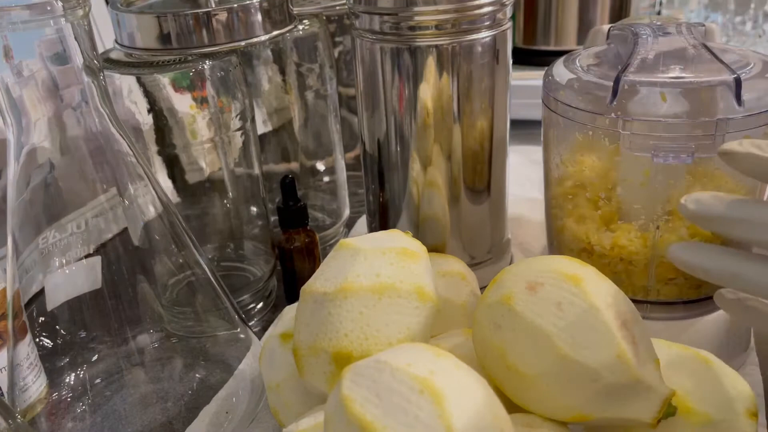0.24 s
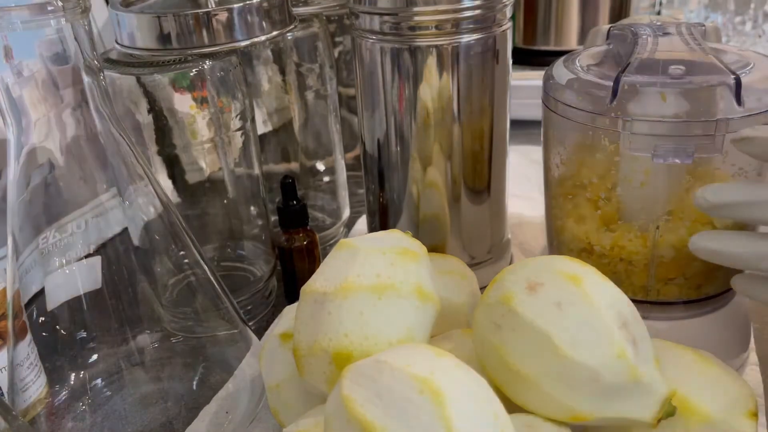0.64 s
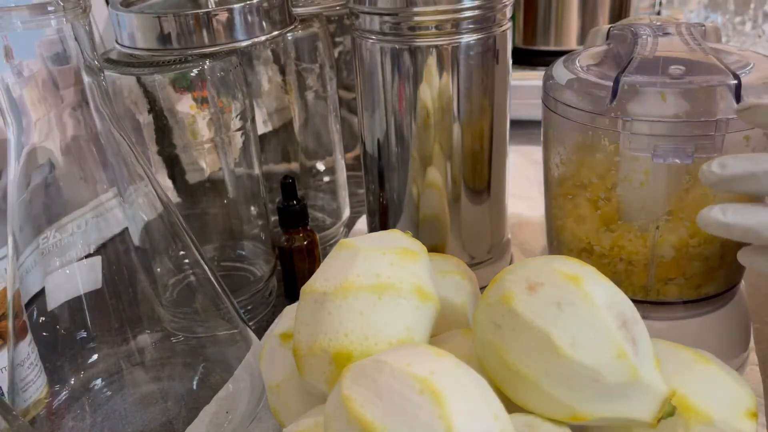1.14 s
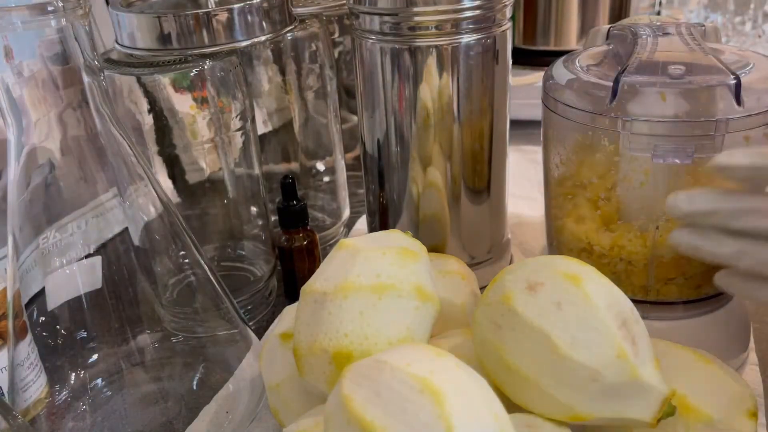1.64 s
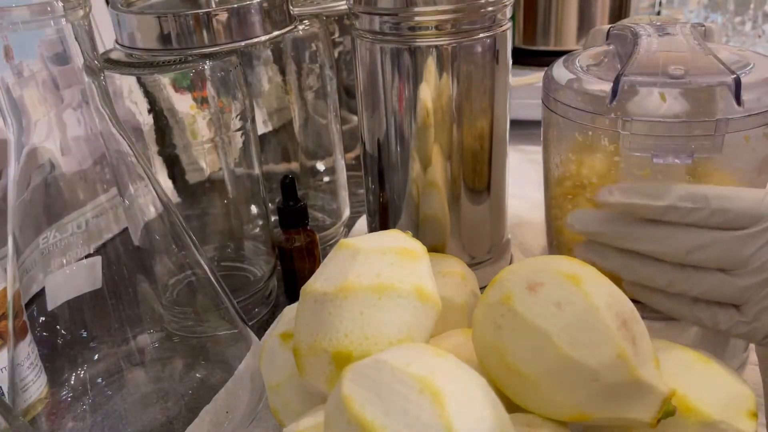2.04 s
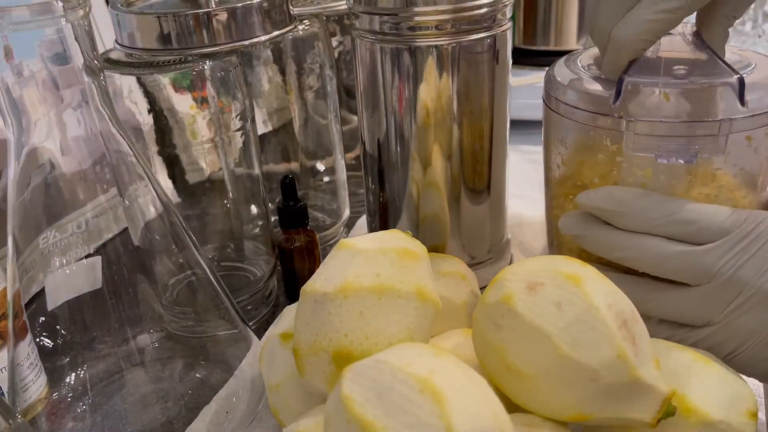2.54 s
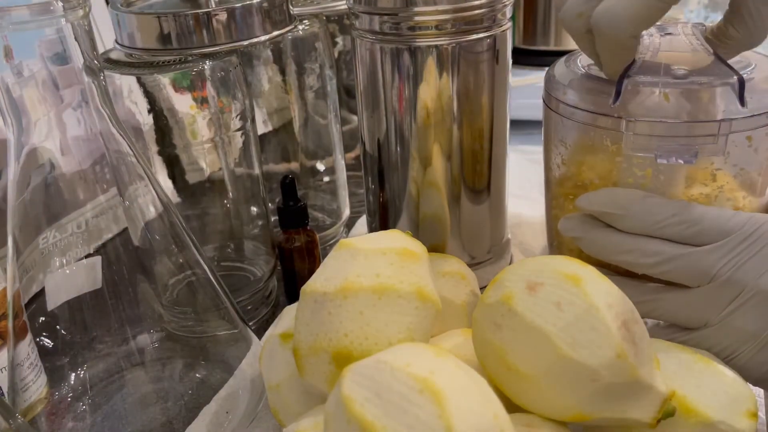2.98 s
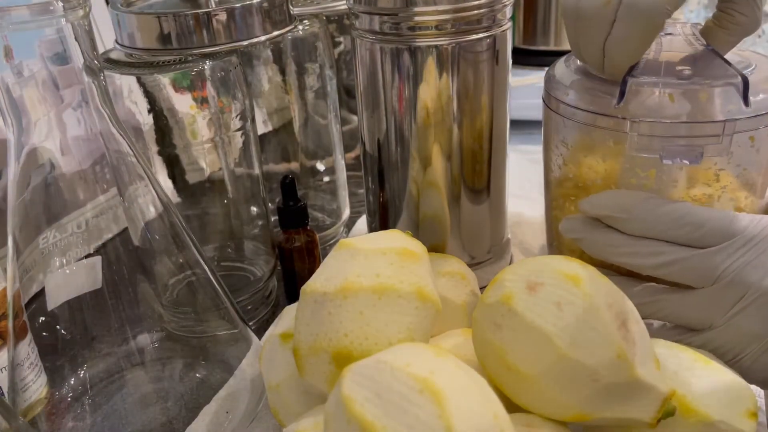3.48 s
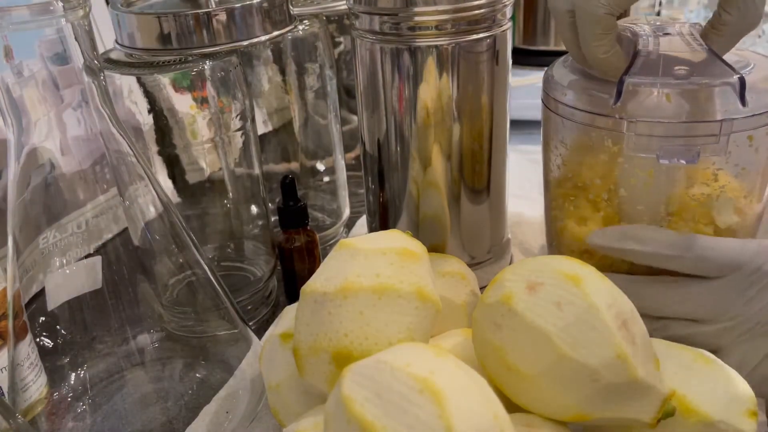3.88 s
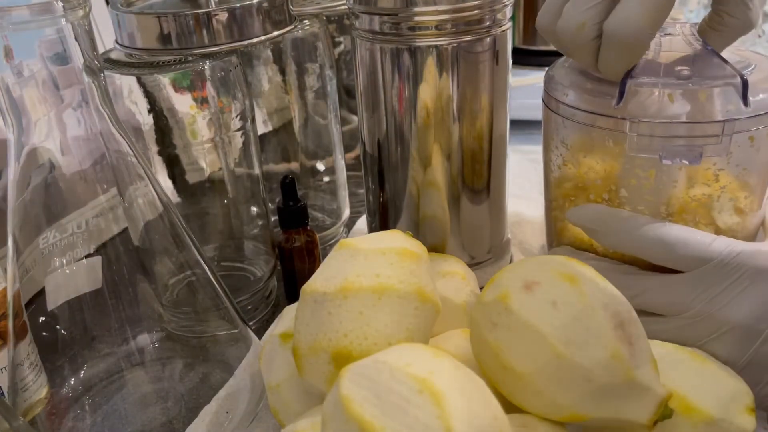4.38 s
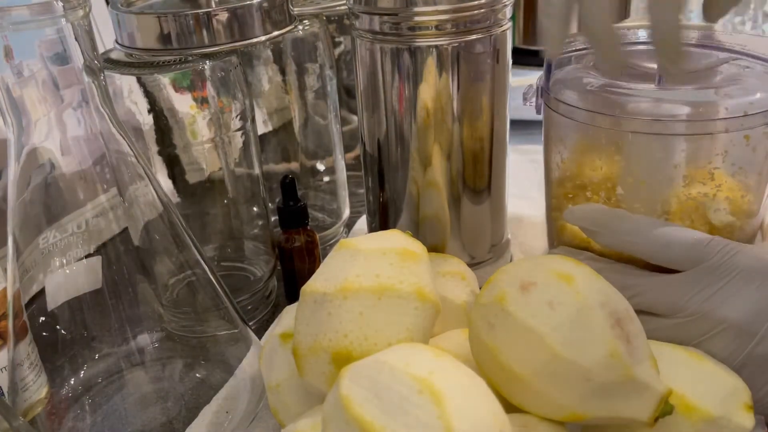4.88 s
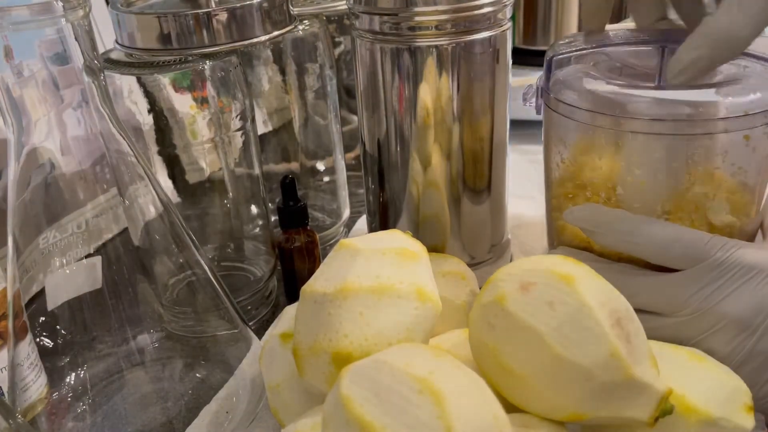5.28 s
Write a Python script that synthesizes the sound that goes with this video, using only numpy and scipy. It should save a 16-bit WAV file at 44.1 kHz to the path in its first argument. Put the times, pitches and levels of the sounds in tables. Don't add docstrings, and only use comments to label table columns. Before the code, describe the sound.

Gloved hands fumble with a small plastic chopper on a counter, with ticks and knocks, until the lid cracks loose loudly and drops back.

```python
import sys
import numpy as np
from scipy import signal
from scipy.io import wavfile
from scipy.ndimage import map_coordinates

SR = 44100
rng = np.random.default_rng(int(sys.argv[2]) if len(sys.argv) > 2 else 0)


def transcribe(u):
    v = np.clip(np.atleast_2d(u).T, -1, 1)
    q = np.round(v * 32767).astype(np.int16)
    wavfile.write(sys.argv[1], SR, q)


def volts(x):
    e = np.asarray(x, float) / 20
    return 10 ** e


N = 243431
TIME = np.arange(N) / SR


def rms_one(x):
    return x / np.sqrt(np.mean(x ** 2) + 1e-20)


def band(x, low_hz, high_hz):
    limits = [low_hz, min(high_hz, .45 * SR)]
    return signal.sosfilt(signal.butter(2, limits, "band", fs=SR, output="sos"), x)


def bank(level_of, per_octave=2):
    white = rng.standard_normal((2, N))
    edges = 45 * 2 ** np.arange(0, 8.6, 1 / per_octave)
    total = 0
    for k, (low, high) in enumerate(zip(edges, edges[1:])):
        total = total + band(white[k % 2], low, high) * level_of(np.sqrt(low * high))
    return total


def at_hz(points, hz):
    points = np.array(points)
    return np.interp(np.log(hz), np.log(points[:, 0]), points[:, 1])


def drift(rate):
    knots = rng.standard_normal(600)
    return map_coordinates(knots, [TIME * rate + 2], order=3)


def friction(per_s, spread_db):
    sizes = volts(spread_db * np.minimum(rng.exponential(1, N), 4)) * rng.standard_normal(N)
    return sizes * (rng.random(N) < per_s / SR)


def ring(push, hz, t60):
    radius = volts(-60 / (t60 * SR))
    angle = 2 * np.pi * hz / SR
    return signal.lfilter([0, np.sin(angle)], [1, -2 * radius * np.cos(angle), radius ** 2], push + 1e-18)


def rattle(t60, rise_s):
    t = TIME[:SR // 2]
    return rng.standard_normal(len(t)) * volts(-60 * t / max(t60, .001)) * np.clip(t / rise_s, 0, 1)


def add(out, s, sound, peak_db):
    at = round(s * SR)
    out[at:at + len(sound)] += (volts(peak_db) * sound / np.abs(sound).max())[:N - at]


def add_edges(out, s, push, peak_db, clack_db, crack_db, top_hz=8700):
    add(out, s, band(band(push, 900, 3120), 740, 6600), peak_db + clack_db)
    add(out, s, band(push, 4600, top_hz), peak_db + crack_db)


def contacts(table, rise_s, hollow_db, crack_db, follows):
    out = np.zeros(N)
    for s, peak_db, hz, hard_db, t60 in table:
        push = rattle(t60, rise_s)
        add(out, s, band(push, hz / 1.89, hz * 1.525), peak_db - 4.0)
        add(out, s, ring(push, hz, 16 / hz), peak_db + hollow_db)
        treble = push * volts(-60 * TIME[:SR // 2] / max(t60, .001))
        add_edges(out, s, treble, peak_db, hard_db + 4.0, crack_db + follows * hard_db)
    return out


def strokes(moves, rest_db, rise_s, fall_s):
    power = volts(rest_db) ** 2
    for s, length, db in moves:
        rising = (TIME - s) / rise_s + .5
        falling = (s + length - TIME) / fall_s + .5
        shape = np.clip(np.minimum(rising, falling), 0, 1)
        power = power + (volts(db) * np.sin(np.pi / 2 * shape) ** 2) ** 2
    return np.sqrt(power)


def leaning():
    # start_s, length_s, rumble_db
    leans = [
        (0.0, 0.077, -15),
        (1.06, 0.24, -28.5),
        (1.6, 0.24, -28.5),
        (2.34, 0.056, -33),
        (2.65, 0.11, -31),
        (2.98, 0.19, -32.5),
        (3.3, 0.33, -46),
        (4.46, 0.29, -26),
        (4.84, 0.2, -28),
        (5.18, 0.084, -30.5),
    ]
    shaking = rng.standard_normal(N)
    rumble = volts(-6) * rms_one(band(band(band(shaking, 10, 21), 10, 24), 10, 30))
    hum = volts(-54) * rms_one(band(shaking, 27, 42)) * volts(1.2 * drift(3.2))
    return hum + rumble * strokes(leans, rest_db=-38, rise_s=0.077, fall_s=0.077)


def room_hiss():
    # pitch_hz, level_db
    colour = [(50, 7.5), (120, -3.5), (300, -8.5), (800, -18.5), (2000, -25), (5000, -31.5), (10000, -39),
              (15500, -33.5)]
    return volts(-58.5) * rms_one(bank(lambda hz: volts(at_hz(colour, hz))))


def sleeve_and_gloves():
    # start_s, length_s, level_db
    sleeve_moves = [(.6, 0.2, -60), (1.11, 0.22, -53), (1.24, 0.16, -66), (3.44, 0.18, -64),
                    (1.4, 0.26, -54), (1.62, 0.12, -60), (1.8, 0.086, -60.5), (2.25, 0.023, -39),
                    (2.33, 0.17, -59), (2.66, 0.09, -55.5), (2.84, 0.078, -64), (2.97, 0.099, -60.5),
                    (3.25, 0.83, -64), (3.99, 0.065, -54), (4.1, 0.55, -60), (4.47, 0.25, -49),
                    (4.7, 0.28, -58.5), (5.1, 0.12, -53.5), (5.28, 0.065, -40), (5.4, 0.18, -45)]
    # start_s, length_s, rustle_db, drag_db (against the rustle)
    grips = [(.08, 0.49, -70.5, -8.5), (0.927, 0.14, -67.5, -8), (1.154, 0.29, -64.5, -22),
             (1.587, 0.46, -73, -2.5), (2.265, 0.11, -61.5, -12), (2.411, 0.14, -62, -17),
             (2.597, 0.079, -62.5, -4), (2.826, 0.11, -61.5, -4), (2.952, 0.045, -63, -18),
             (3.45, 0.18, -65, -5), (3.764, 0.097, -74, 9.5), (3.913, 0.175, -69, 6),
             (4.122, 0.13, -68.5, -3), (4.45, 0.26, -55.5, -2), (4.822, 0.2, -63, -6),
             (5.041, 0.15, -71, 9.5), (5.272, 0.21, -52, 3)]
    sleeve = rms_one(band(friction(4000, 2.2), 150, 1200)) * volts(3 * drift(30))
    drag = rms_one(band(band(friction(12000, 1.2), 1600, 3000), 1300, 3300)) * volts(1.5 * drift(30))
    rustle = rms_one(band(friction(20000, 1.2), 3900, 11000)) * volts(1.5 * drift(30))
    drag_moves = [(s, length, db + rel_db) for s, length, db, rel_db in grips]
    rustle_moves = [(s, length, db) for s, length, db, _ in grips]
    return (sleeve * strokes(sleeve_moves, rest_db=-71.5, rise_s=0.04, fall_s=0.098)
            + drag * strokes(drag_moves, rest_db=-94, rise_s=0.085, fall_s=0.12)
            + rustle * strokes(rustle_moves, rest_db=-73.5, rise_s=0.085, fall_s=0.12))


def ticks():
    # start_s, peak_db, centre_hz, rattle_t60_s
    clicks = [(0.065, -32.5, 4600, 0.0054), (.0650, -46, 2710, .006), (0.255, -49.5, 2700, 0.0087),
              (.268, -51, 10000, .012), (0.4052, -28, 5400, 0.0022), (0.4054, -37.5, 2720, 0.011),
              (0.657, -47, 4100, 0.0071), (1.481, -22.5, 5200, 0.093), (2.085, -45.5, 3930, 0.011),
              (2.5857, -43, 9050, 0.0048), (2.702, -32.5, 6300, 0.0068), (3.365, -50, 4500, 0.037),
              (3.5307, -36.5, 3900, 0.0025), (3.53, -40.5, 9100, 0.025), (3.576, -31.5, 9400, 0.021),
              (3.5754, -41.5, 1970, 0.042), (4.1116, -37, 4440, 0.0041), (4.18, -50, 10000, 0.017),
              (4.277, -38, 4140, 0.0046), (4.6136, -29.5, 5240, 0.027)]
    out = np.zeros(N)
    for s, peak_db, hz, t60 in clicks:
        add(out, s, band(rattle(t60, .0001), hz / 1.6, min(hz * 1.7, 12500)), peak_db)
    return out


def counter():
    # start_s, peak_db, pitch_hz, t60_s
    swings = [(0.066, -45, 190, 0.041), (0.404, -39.5, 199, 0.033), (1.122, -28.5, 179, 0.09),
              (1.162, -29.5, 204, 0.052), (1.195, -31, 263, 0.039), (1.14, -23, 20.65, 1),
              (2.245, -24.5, 127, 0.12), (2.256, -31, 45.8, 0.81), (3.372, -42, 141, 0.11),
              (3.578, -43, 288, .04), (.78, -46.5, 165, .07), (.88, -48.5, 155, 0.075),
              (1.239, -48, 176, .15), (1.289, -47, 216, 0.12), (4.329, -52, 350, .15),
              (4.372, -46, 345, .2), (4.089, -38, 170, 0.019), (4.221, -40.5, 245.6, 0.021),
              (4.467, -16.5, 169.2, 0.18), (4.47, -28.5, 36, .7), (4.462, -30.5, 85, .3),
              (4.76, -49, 299.4, .1), (5.2, -40, 60.26, .3), (4.6, -12.5, 170, 0.024),
              (4.6, -28, 111, 0.11), (4.74, -34, 109.7, 0.14), (4.849, -42.5, 137, 0.076),
              (5.079, -34.5, 107.6, 0.11), (5.289, -38, 135, 0.26), (5.407, -36, 160, 0.089)]
    out = np.zeros(N)
    for s, db, hz, t60 in swings:
        push = np.sin(np.pi * np.clip(TIME[:SR] * hz / 0.64, 0, 1)) ** 2
        add(out, s, ring(push, hz, t60), db)
    return out


def rubs():
    # start_s, stop_s, hum_db, hiss_db
    slides = [
        (0.074, 0.183, -63, -65.5),
        (0.41, 0.516, -67, -64),
        (1.6, 1.737, -68.5, -66),
        (1.822, 1.931, -66.5, -66.5),
        (2.3, 2.36, -68, -66),
    ]
    slips = friction(15000, 1.2)
    hum = rms_one(band(slips, 2650 / 1.1, 2650 * 1.1))
    hiss = rms_one(band(slips, 4700 / 1.25, 4700 * 1.25))
    out = np.zeros(N)
    for start, stop, hum_db, hiss_db in slides:
        gate = np.clip(np.minimum((TIME - start) / .004, (stop - TIME) / .015), 0, 1)
        out += gate * (volts(hum_db) * hum + volts(hiss_db) * hiss)
    return out


def finger_taps():
    # start_s, peak_db, knock_hz, hardness_db, rattle_t60_s
    touches = [(2.442, -30.5, 550, -8.5, 0.063), (3.063, -34.5, 500, -7, 0.075),
               (3.221, -41, 520, -6, 0.078), (3.299, -46, 470, -14, 0.05), (3.617, -51, 374, -1.5, 0.037),
               (3.702, -46.5, 570, 5, 0.07), (3.998, -45.5, 660, 4.5, 0.12), (5.418, -21, 1700, -16, 0.15),
               (4.09, -40, 543, -5, 0.058), (2.446, -38, 1330, -26, 0.099), (0.6, -55, 1790, -27, .07),
               (1.158, -42, 2000, -29, .15), (1.18, -38.5, 600, -30, 0.3), (1.393, -37, 315, -30, 0.056),
               (3.356, -38.5, 413, -30, .12), (1.352, -39, 430, -32, 0.052)]
    return contacts(touches, rise_s=0.0011, hollow_db=-6.5, crack_db=-5.5, follows=1.62)


def soft_bumps():
    # start_s, peak_db, knock_hz, hardness_db, rattle_t60_s
    bumps = [(.607, -40, 700, -43, 0.065), (.648, -55, 580, -27, .06), (.695, -47, 656, -32, 0.056),
             (.74, -56, 566, -5, 0.041), (.777, -49.5, 650, -27, 0.06), (.818, -52, 574, -28, 0.053),
             (1.077, -42.5, 716, -31, 0.14), (1.125, -42, 370, -11, 0.058), (1.171, -38, 1880, -37, 0.14),
             (1.177, -54.5, 1750, 12.5, 0.24), (2.488, -53.5, 1310, 0.5, 0.093),
             (2.616, -43, 440, -18, 0.05), (2.64, -57, 910, -23, 0.029), (2.689, -41, 510, -20, 0.063),
             (2.993, -44, 615, -12.5, 0.046), (3.029, -47, 464, -26, 0.024), (3.351, -38, 1010, -26, 0.14),
             (3.372, -38, 1280, -16, 0.023), (3.391, -45, 1240, -33, 0.041), (4.285, -47, 824, -28, 0.034),
             (4.733, -40.5, 832, -2, 0.091), (4.738, -36.5, 1230, -8.5, 0.065)]
    return contacts(bumps, rise_s=0.015, hollow_db=-3.0, crack_db=1.5, follows=1.0)


def panel_notes():
    # start_s, peak_db, pitch_hz, t60_s
    finger_notes = [(.607, -50, 650, .05), (.608, -48.5, 1800, .03), (.652, -51, 560, .08),
                    (.696, -49, 620, .08), (.698, -55, 1850, .04), (.738, -54, 540, .06),
                    (.779, -54, 610, .08), (.779, -59, 1800, .04), (.818, -53, 560, .06),
                    (1.079, -51.5, 1760, 0.036), (1.476, -15.5, 910, 0.017), (1.495, -24, 1055, .08),
                    (1.124, -43, 616, .05), (1.21, -49, 613, .06), (1.225, -52, 1650, .06),
                    (1.41, -41, 1250, .12), (2.443, -36, 1250, 0.033), (2.452, -45, 1490, 0.036),
                    (2.444, -43, 644, 0.044), (2.474, -53, 1290, .08), (2.627, -41.5, 864, .03),
                    (2.626, -37, 443, .06), (3.064, -43, 1043, .06), (3.064, -46, 1440, .05),
                    (3.064, -40.5, 3340, 0.018), (3.222, -48, 1050, .06), (3.222, -52, 1450, .05),
                    (3.365, -43, 1436, .06), (3.358, -51, 890, 0.035), (3.487, -48, 480, .04),
                    (3.531, -47.5, 2230, .04), (3.533, -51, 424, 0.061), (3.578, -54, 1500, .04),
                    (3.655, -54, 450, .05), (3.703, -50, 550, .04), (3.838, -54, 640, .04),
                    (4.074, -48, 1100, .02), (4.074, -47, 300, 0.028), (4.284, -48, 800, 0.082),
                    (4.298, -53, 704, .05), (1.49, -28.5, 499, 0.14), (1.478, -28, 2040, .03),
                    (1.48, -36, 278, 0.22), (1.478, -26, 1147, 0.047), (1.392, -34, 1850, 0.034),
                    (1.394, -40, 2390, .03), (3.369, -48, 4500, .012), (3.392, -53, 4500, .012),
                    (3.576, -41, 5700, .008), (3.224, -48.5, 450, 0.12), (4.408, -56, 2600, .04),
                    (4.443, -45, 4500, 0.01)]
    # start_s, peak_db, pitch_hz, t60_s
    lid_notes = [(4.452, -19, 250, 0.033), (4.459, -9, 320, 0.14), (4.4603, -8, 1570, .06),
                 (4.46, -10.5, 1867, .07), (4.475, -15, 940, 0.076), (4.468, -16, 1130, .05),
                 (4.478, -20, 2146, .07), (4.46, -11, 2650, .06), (4.46, -13, 2866, 0.051),
                 (4.458, -3, 5100, 0.015), (4.471, -20, 5163, 0.049), (4.513, -21, 2100, .02),
                 (4.612, -36, 1400, .03), (4.612, -38, 1080, .03), (4.695, -41, 500, .03),
                 (4.75, -42, 330, 0.047), (4.461, -18, 440, .12), (4.463, -18.5, 587.4, 0.11),
                 (4.53, -32, 432, 0.23), (4.63, -41, 450, 0.23), (5.056, -19.5, 795, 0.038),
                 (5.056, -24, 401, 0.042), (5.405, -14.5, 3100, .03), (4.46, -12, 2300, 0.098),
                 (4.464, -12.5, 3180, 0.03), (4.462, -13.5, 509, .1), (4.462, -16, 791, .1),
                 (4.461, -21, 4270, .08), (5.056, -20.5, 662, .06), (5.0556, -11, 2800, 0.01),
                 (5.0551, -16, 1050, 0.018), (5.058, -22, 450, 0.084), (5.058, -26.5, 1570, 0.064),
                 (5.27, -37, 1670, .05), (5.299, -27.5, 396, 0.027), (5.405, -18.5, 1545, 0.11),
                 (5.405, -15, 1650, .03), (5.408, -26, 2358, 0.13), (5.064, -30, 530, 0.051),
                 (5.388, -23, 2870, .03), (5.405, -13.5, 328.3, 0.144), (5.405, -18.5, 930, 0.11),
                 (5.405, -22.5, 732, 0.13), (5.406, -20.5, 1943, 0.14)]
    out = np.zeros(N)
    t = TIME[:SR // 2]
    for s, db, hz, t60 in finger_notes + lid_notes:
        swell = np.sin(np.pi * np.clip(t * hz, 0, 1)) ** 2
        add(out, s, ring(swell * np.cos(2 * np.pi * hz * t), hz, t60), db)
    return out


def chatter():
    # start_s, peak_db, knock_hz, hardness_db, rattle_t60_s
    loose_parts = [(1.13, -45, 750, -20, .5), (1.21, -43, 900, -20, .4), (1.49, -29, 1190, -25, .32),
                   (2.25, -31, 910, -20, .14), (2.46, -47, 1300, -23, .16), (4.277, -53.5, 2500, 4.5, 0.01),
                   (4.464, -6, 2400, -7, .12), (4.476, -12, 1500, -11, 0.23), (4.74, -42, 418, -12.5, .08),
                   (5.057, -18, 1300, -7.5, .07), (5.407, -10, 1490, -8, .1), (5.41, -14.5, 900, -14, .2),
                   (2.7, -47, 700, -12, .12), (3.36, -44, 1500, -10, .12), (3.02, -52, 400, -10, 0.065),
                   (4.52, -29.5, 1400, -10, 0.36), (5.43, -23, 1700, -12, .2)]
    return contacts(loose_parts, rise_s=0.004, hollow_db=-16.0, crack_db=-8.0, follows=1.3)


def base_knocks():
    # start_s, peak_db, knock_hz, hardness_db, rattle_t60_s
    knocks = [
        (1.352, -37, 1230, -38, 0.063),
        (1.386, -28.5, 990, -9, 0.055),
        (1.393, -24, 1006, -27, 0.051),
        (1.41, -30, 1250, -32, 0.06),
        (1.4755, -15.5, 640, -10.5, 0.1),
        (1.483, -18, 860, -39, 0.26),
        (2.241, -25, 490, -11, 0.15),
        (2.249, -20, 393, -20, 0.072),
        (2.26, -16, 594, -30, 0.02),
    ]
    return contacts(knocks, rise_s=0.00062, hollow_db=-8.5, crack_db=-6.0, follows=0.96)


def squeak():
    # time_s, pitch_hz, level_db
    glide = [
        (2.298, 13430, -95),
        (2.329, 13800, -78),
        (2.361, 14000, -78),
        (2.39, 14600, -71),
        (2.42, 13700, -87),
    ]
    s, hz, level_db = np.transpose(glide)
    phase = 2 * np.pi * np.cumsum(np.interp(TIME, s, hz)) / SR
    return volts(np.interp(TIME, s, level_db, left=-150, right=-150)) * np.sin(phase)


def blows():
    # start_s, peak_db, bowl_ring_db, crack_db, rattle_t60_s
    hits = [
        (4.449, -31, -2, -8, 0.1),
        (4.4525, -20, -1, -12, 0.04),
        (4.4571, 8.5, -10, -9, 0.078),
        (4.6, -34, 13, -20.5, .05),
        (5.0556, -8.5, -15, -10.5, 0.031),
        (5.299, -31, 2, -14.5, .04),
        (5.389, -15, -1, -21.5, 0.023),
        (5.404, 3.5, -8.5, -11.5, 0.038),
    ]
    # pitch_hz, level_db, t60_s
    bowl_modes = [(321, 1, 0.094), (450, -5, 0.048), (509, -13, 0.1), (670, -18.5, 0.035),
                  (780, -10.5, 0.036), (890, -13, .07), (1124, -5.5, .08), (1300, -12.5, 0.062),
                  (1580, -12, 0.13), (1866, -9.5, 0.14), (2120, -10, 0.072), (2380, -15.5, .08)]
    out = np.zeros(N)
    for s, peak_db, ring_db, crack_db, t60 in hits:
        push = rattle(t60, .0005)
        touch = np.exp(-TIME[:SR // 2] / .00015)
        bowl = 0
        for hz, db, ringing in bowl_modes:
            bowl = bowl + volts(db + rng.normal(0, 2)) * ring(touch, hz, ringing)
        add(out, s, band(band(rattle(t60, 0.0024), 310, 525), 200, 700), peak_db - 14)
        add(out, s, band(push + 0.89 * touch, 640, 1587), peak_db - 8)
        add(out, s, bowl, peak_db + ring_db)
        add_edges(out, s, push, peak_db, -3.5, crack_db + 0.5, top_hz=11380)
    return out


def blade():
    # pitch_hz, level_db, t60_s
    blade_modes = [(5200, -3, .08), (6300, -6, .6), (6444, -3, .12), (7547, -5, .15), (8759, 0, .06),
                   (9275, -8, .3), (9450, -3, .17)]
    click = volts(-49.5) * (np.arange(N) == round(4.613 * SR))
    return sum(volts(db) * ring(click, hz, t60) for hz, db, t60 in blade_modes)


def lid_drag():
    # time_s, level_db
    path = [
        (5.251, -59),
        (5.263, -42),
        (5.299, -36),
        (5.331, -45),
        (5.365, -44.5),
        (5.386, -31.5),
        (5.403, -38.5),
    ]
    # pitch_hz, width_hz, level_db
    rim_modes = [(1680, 130, -5), (2950, 170, 0), (7500, 2500, -9)]
    slips = friction(12000, 2.0)
    tone = volts(2) * rms_one(band(band(slips, 400, 12000), 200, 12000))
    for hz, width_hz, db in rim_modes:
        tone += volts(db) * rms_one(ring(slips, hz, np.log(9) / width_hz))
    s, level_db = np.transpose(path)
    return rms_one(tone) * volts(np.interp(TIME, s, level_db, left=-150, right=-150))


def kitchen(x, gap_s=0.00022):
    # pitch_hz, t60_s
    echo_times = [(150, 0.61), (400, 0.27), (1000, 0.26), (2500, 0.24), (6000, 0.28), (13000, 0.19)]
    echoes = bank(lambda hz: volts(-60 * TIME / at_hz(echo_times, hz)))[:SR]
    echoes = echoes * np.clip(TIME[:SR] / gap_s - 1, 0, 1)
    return signal.fftconvolve(x, echoes / np.sqrt(np.sum(echoes ** 2)))[:N]


def counter_reflection(x):
    return x - 0.35 * band(x, 3740 - 860 / 2, 3740 + 860 / 2)


def scene():
    near = ticks()
    fingers = finger_taps() + base_knocks() + soft_bumps()
    lid = panel_notes() + blows() + blade() + lid_drag()
    echoes = kitchen(volts(-8.5) * near + volts(-9.0) * fingers + volts(-10.5) * lid)
    hands = leaning() + sleeve_and_gloves()
    close = counter_reflection(near + fingers + lid + hands + echoes)
    other = counter() + squeak() + room_hiss() + rubs() + chatter()
    return (close + other)[None]


def top_cut(x):
    return signal.sosfilt(signal.butter(12, 15750, fs=SR, output="sos"), x)


def record(dry):
    overloaded = dry / (1 + np.abs(dry / 0.95) ** 16) ** (1 / 16)
    return top_cut(overloaded)


dry = scene()
out = record(dry)
transcribe(out)
```